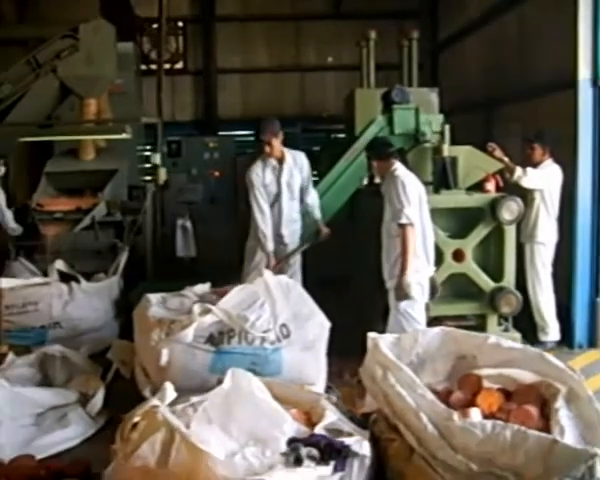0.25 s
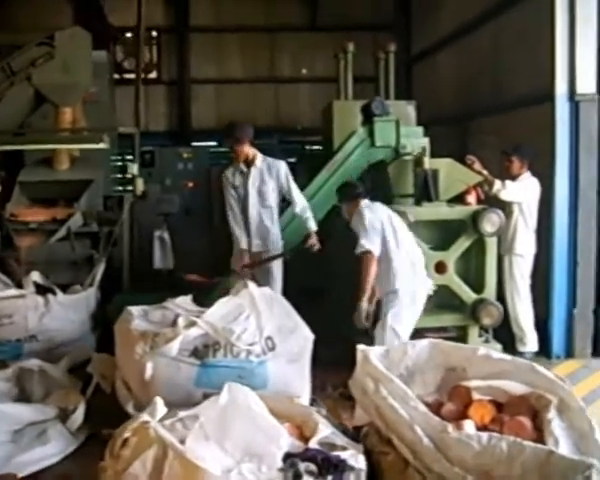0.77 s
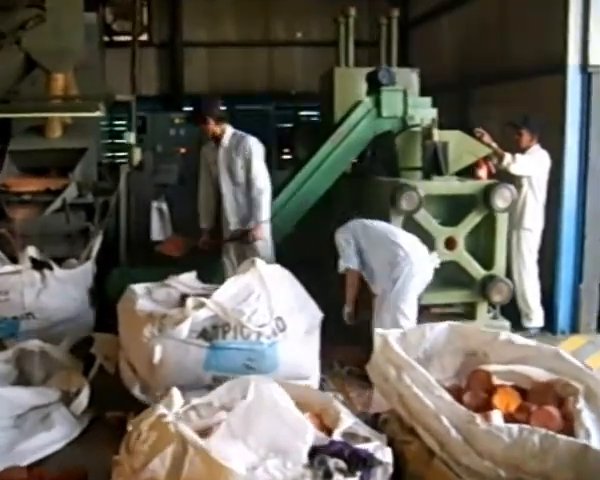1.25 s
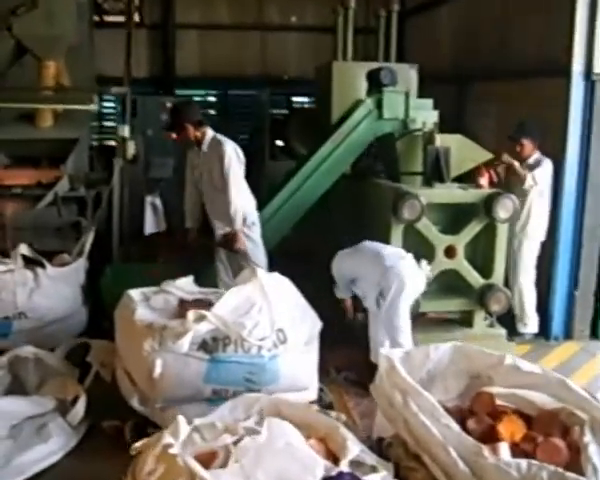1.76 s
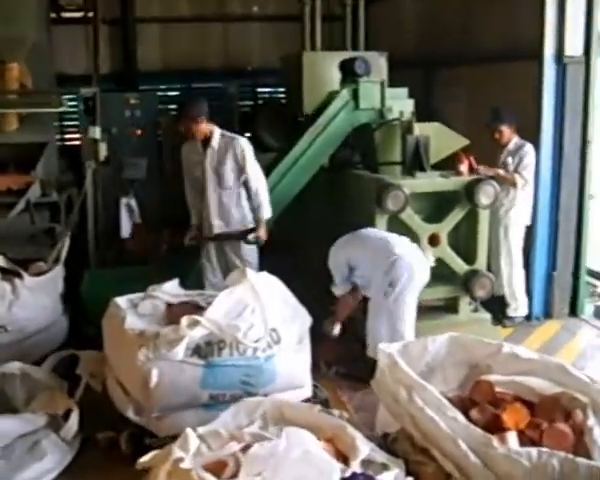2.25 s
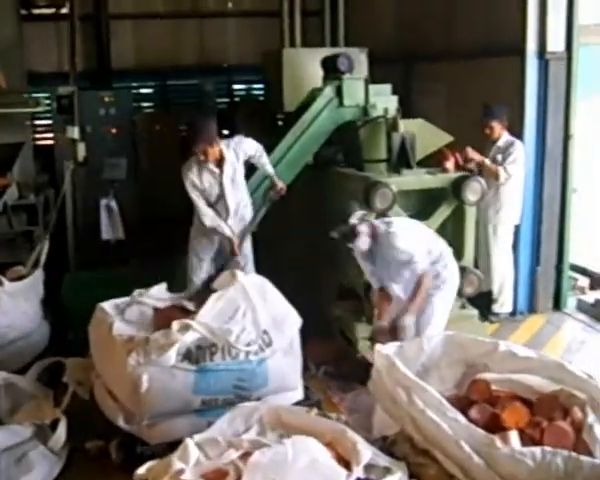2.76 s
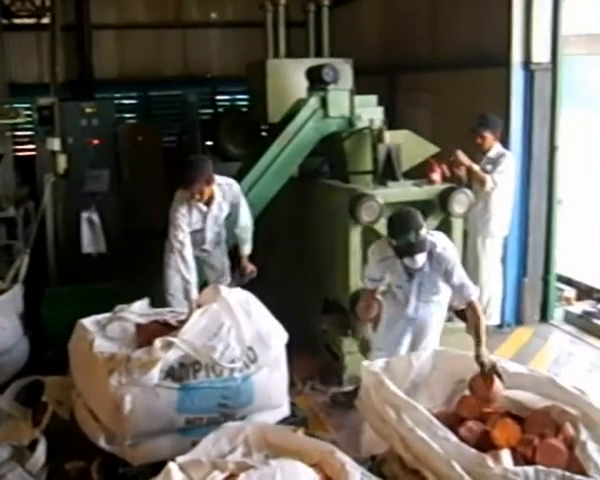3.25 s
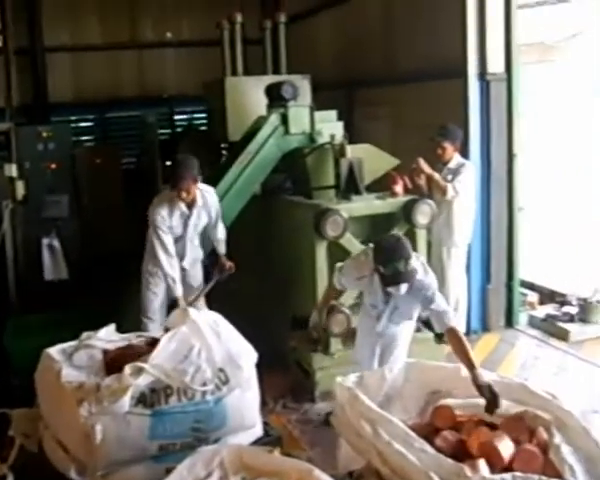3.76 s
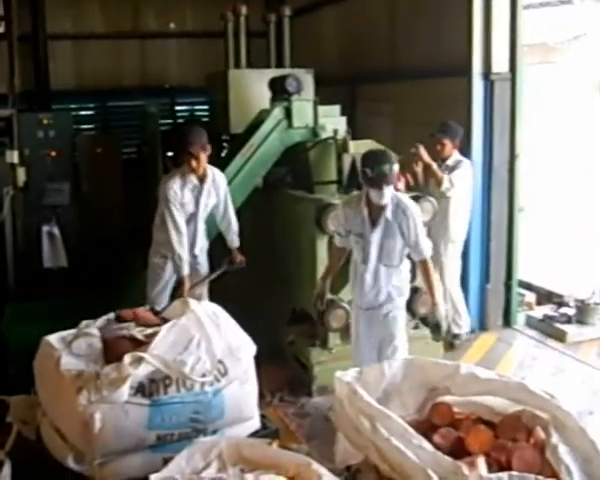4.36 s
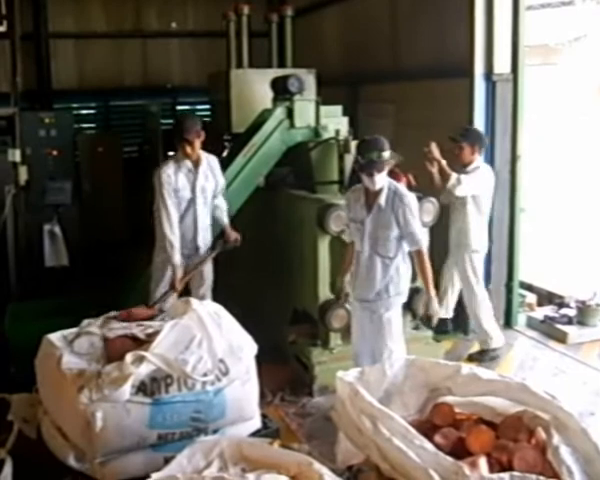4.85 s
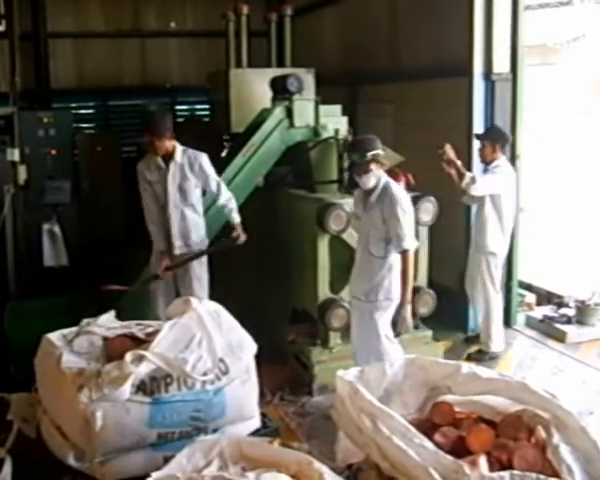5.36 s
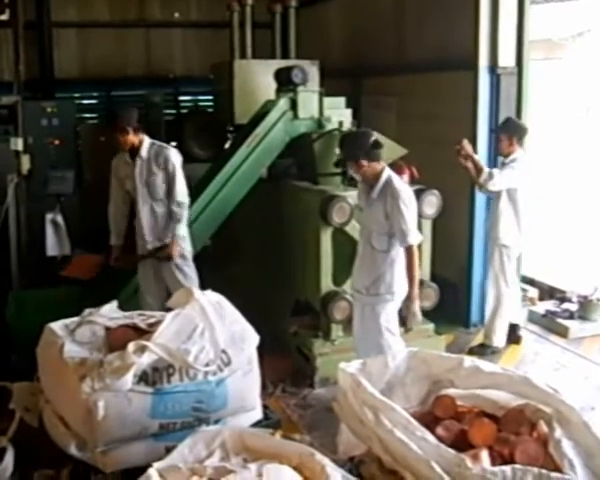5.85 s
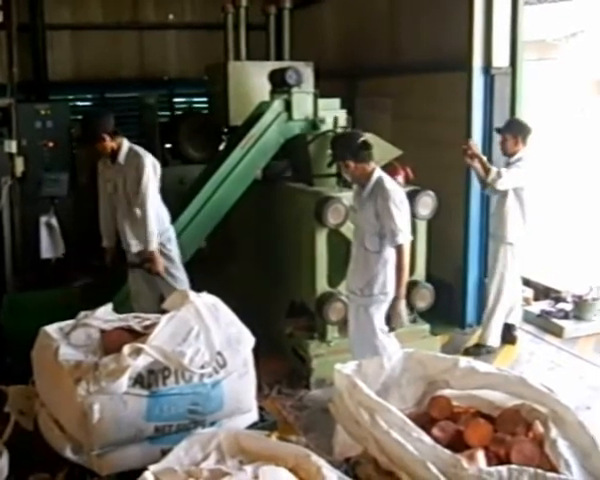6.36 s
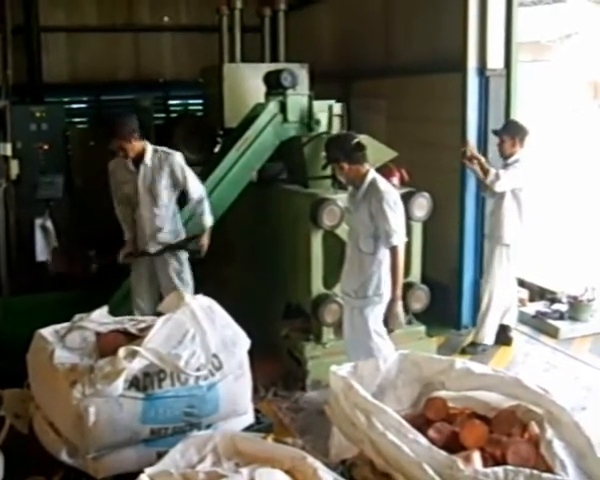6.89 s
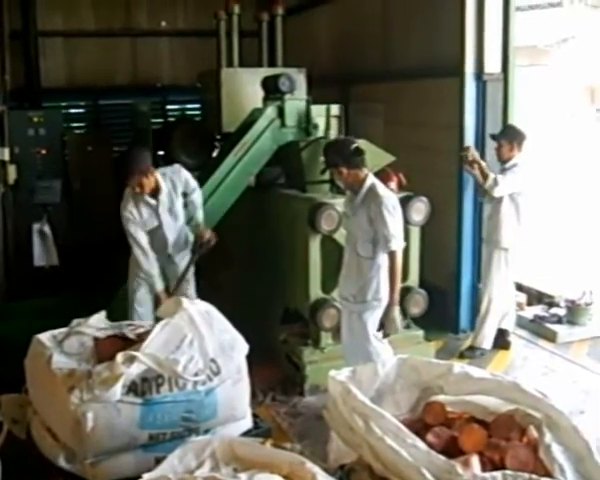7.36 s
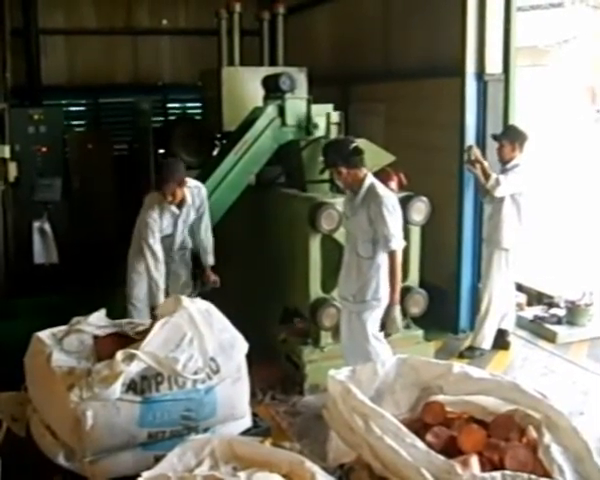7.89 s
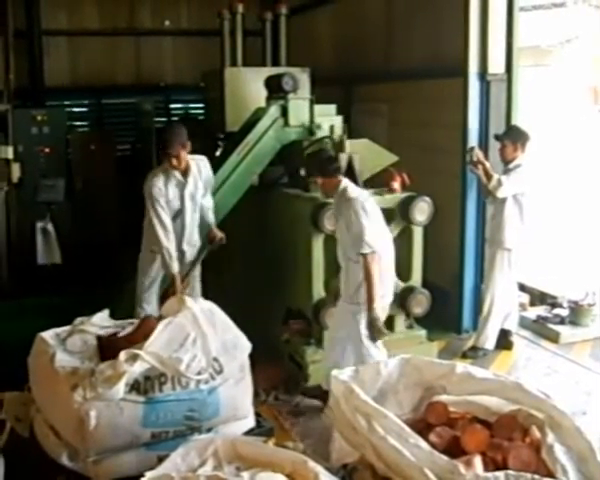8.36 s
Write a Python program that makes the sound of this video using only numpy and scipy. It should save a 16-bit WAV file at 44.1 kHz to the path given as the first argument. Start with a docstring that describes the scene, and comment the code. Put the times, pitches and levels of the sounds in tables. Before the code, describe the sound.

A hydraulic press runs in a factory hall, with a steady pump and motor hum over a roar of fans and hissing oil. Right at the start, four quick steel knocks clank and ring, with one sharp microphone click. The ram thuds at about 1.6 seconds, and metal briquettes clink faintly between 2.6 and 3.4 seconds. At about 4.1 seconds the sound cuts to complete silence for one second. It returns with the pump whining and sagging slightly in pitch, until a valve releases with a gush and a thud at 5.7 seconds. Another faint clink comes at 6.6 seconds. From 7.5 to 8 seconds, loud ringing knocks, heavy thuds and a stronger hissing gush crowd together, and the microphone crackles on the loudest blows. From about 8 seconds a soft low drone joins the continuing hum.

```python
"""Hydraulic briquetting press in a steel-walled hall. Pump and feed motor hum over a roar of oil and fans.
Plates knock and ring, the ram thuds, briquettes clink. At 4.07 s the mono camera cuts out for 1 s.
From 5 s pressure builds: the pump sags and whines until a valve lets go with a gush and a thud.
From 7.5 s: more knocks, thuds and a gush; the camera overloads and crackles on the loudest knocks.
At 8.05 s a low drone starts the next stroke."""
import sys
import numpy as np
from scipy import signal
from scipy.fft import rfft, irfft, next_fast_len
from scipy.io import wavfile
from scipy.ndimage import map_coordinates

SR = 44100
rng = np.random.default_rng(int(sys.argv[2]) if len(sys.argv) > 2 else 0)


def generate_wav(sig):
    """Save sig (samples, or channels by samples) to the path in sys.argv[1] as 16-bit PCM at SR."""
    pcm = np.round(np.clip(np.atleast_2d(sig).T, -1, 1) * 32767).astype(np.int16)
    wavfile.write(sys.argv[1], SR, pcm)


N = 380141

PUMP_HZ, MOTOR_HZ = 58.32, 24.52
PRESS_START_S, PRESS_END_S, LOAD_ATTACK_S = 5.0, 5.72, .2

# steel on steel: t/s, clank/dB, cover ring/dB, die ring/dB, clank T60/s
PLATE_KNOCKS = [(.134, -11.5, -8.5, -25, 0.49), (.166, -19, -9.5, -38, 0.33), (.213, -13.5, -22, -20, 0.82),
                (.335, -25, -18, -36, 0.72), (7.464, -14, -34, -17, 0.28), (7.859, -12.5, -30, -14, 0.93),
                (7.89, -15.5, -21, -15, 1)]
# ram stops: t/s, level/dB
RAM_STOPS = [(1.557, -16.5), (5.736, -15), (7.484, -14.5), (7.57, -18), (7.932, -15.5)]
# valve releases: t/s, level/dB, rise/s
VALVE_RELEASES = [(5.67, -22, 0.02), (7.543, -16.5, 0.0088)]
# briquettes and swarf: t/s, level/dB
BRIQUETTE_CLINKS = [(2.622, -36), (3.014, -30), (3.061, -36), (3.34, -29), (6.565, -35)]
# steady noise: t/s, roar/dB, oil hiss/dB
FLOW_LEVELS = [(0, -16.5, -32), (.6, -19, -30.5), (3, -19.5, -29), (5.1, -19, -30), (6.2, -19.5, -29),
               (8.6, -19, -30)]
# camera overload clicks: t/s, level/dB
OVERLOAD_CLICKS = [(0.217, -13), (7.8645, -9.5), (7.875, -11), (7.907, -12), (7.935, -12), (7.943, -9)]
# camera dropout: start/s, end/s
DROPOUT_S = (4.0708, 5.0705)

# sheet-steel cover modes: f/Hz, level/dB
COVER_MODES = [(455, -8.5), (555, -9.5), (582, 2), (872, -11), (1030, -18.5), (1390, -15.5), (2120, -15),
               (3220, -13), (3520, -16.5), (3980, -14), (4470, -16)]
# heavy die modes: f/Hz, level/dB
DIE_MODES = [(690, -12.5), (797, -5.5), (888, -6.5), (1020, -1.5), (1250, -3.5), (1540, -3), (1740, -10),
             (1900, -7), (2200, -8), (3250, -13.5), (4890, -18)]
# pump whine under load: harmonic, level/dB
WHINE_HARMONICS = [(1, -29), (2, -27.5), (10, -26.5), (11, -36), (13, -34.5), (14, -32), (16, -33),
                   (20, -40)]
# relief valve tones before sag: f/Hz, level/dB
RELIEF_TONES = [(850, -26.5), (1493, -30)]
# pump pistons: harmonic, feed stroke/dB, return stroke/dB
PUMP_HARMONICS = [(4, -36, -55), (8, -47, -42), (9, -35, -32.5), (10, -37, -39.5), (12, -39, -42.5),
                  (14, -37, -44), (15, -42.5, -37), (24, -41.5, -44), (27, -47.5, -41.5), (31, -44, -52),
                  (37, -43, -43.5), (41, -43, -51), (42, -52, -43), (45, -53.5, -43), (62, -45, -45)]
# feed motor shaft: harmonic, level/dB
MOTOR_HARMONICS = [(1, -47), (8, -32.5), (10, -41), (13, -37.5), (15, -27.5), (16, -40), (17, -32),
                   (18, -41), (19, -35), (20, -36)]

# steel clank: f/Hz, relative density/dB
CLANK_SPECTRUM = [(100, -20), (300, -7.5), (550, -0.5), (900, -1), (1600, -5), (2300, -12.5), (3500, -21),
                  (7000, -33), (12000, -54)]
# frame thud: f/Hz, relative density/dB
THUD_SPECTRUM = [(30, -9), (80, -9), (200, 0), (350, -2.5), (600, -13), (1500, -41.5)]
# hiss of a knock: f/Hz, relative density/dB
HISS_SPECTRUM = [(700, -23), (2000, -4), (3300, 4.5), (5000, -1), (7000, -9.5), (10000, -19),
                 (12500, -34.5)]
# released oil: f/Hz, relative density/dB
GUSH_SPECTRUM = [(700, -22), (2000, 4), (3300, 2.5), (5000, 1.5), (7000, -9), (10000, -10), (12500, -28)]
# roar of oil and fans: f/Hz, relative density/dB
ROAR_SPECTRUM = [(26, -58.5), (45, -23), (103, -7.5), (164, -9), (189, -6.5), (341, -1.5), (366, -3),
                 (393, -6.5), (521, -6), (559, -8.5), (795, -9.5), (2770, -20), (5880, -25), (9200, -31),
                 (12500, -50)]
# oil in the valves: f/Hz, relative density/dB
OIL_SPECTRUM = [(1500, -26.5), (2800, -7.5), (3800, 0), (5200, -3), (7000, -9.5), (9500, -13.5),
                (12500, -26)]
# briquette clink, overload click: f/Hz, relative density/dB
CLINK_SPECTRUM = [(800, -16), (2500, 10), (5000, 2), (9000, 9), (12000, -14)]
OVERLOAD_SPECTRUM = [(3000, -6), (6000, 3.5), (9000, 4), (12300, -7)]


def plate_knocks(rise_s=.0034, thud_db=-7.5, hiss_db=-8.5, ring_t60_ratio=1.39):
    """Each blow clanks, thuds in the frame, hisses and rings cover and die."""
    out, t = np.zeros(N), clock()[:SR]
    for start_s, clank_db, cover_db, die_db, t60_s in PLATE_KNOCKS:
        body = noise(CLANK_SPECTRUM, SR) + undb(thud_db) * noise(THUD_SPECTRUM, SR)
        body *= burst(rise_s, t60_s)
        hiss = undb(hiss_db) * noise(HISS_SPECTRUM, SR) * burst(rise_s, t60_s)
        steel = undb(cover_db) * steel_ring(COVER_MODES, t) + undb(die_db) * steel_ring(DIE_MODES, t)
        steel *= burst(rise_s, t60_s * ring_t60_ratio)
        add(out, start_s, undb(clank_db) * (body + hiss) + steel)
    return out


def steel_ring(modes, t, detune=.007, loss_per_cycle=.00098):
    """Close mode pairs beat; higher modes decay sooner."""
    pairs = np.zeros(len(t))
    for hz, db in modes * 2:
        turns = hz * t * (1 + detune * rng.standard_normal()) + rng.random()
        pairs += undb(db) * np.exp(-loss_per_cycle * hz * t) * np.sin(2 * np.pi * turns)
    return pairs / np.sqrt(sum(undb(db) ** 2 for _, db in modes))


def ram_thuds(rise_s=.0058, t60_s=.93, clank_db=-6, ring_db=-11.5):
    """The stopping ram shakes the frame, with some clank and die ring."""
    out, t = np.zeros(N), clock()[:SR]
    for start_s, db in RAM_STOPS:
        body = noise(THUD_SPECTRUM, SR) + undb(clank_db) * noise(CLANK_SPECTRUM, SR)
        body += undb(ring_db) * steel_ring(DIE_MODES, t)
        add(out, start_s, undb(db) * body * burst(rise_s, t60_s))
    return out


def oil_gushes(hold_s=.038, t60_s=1, pipe_db=.5):
    """Released oil hisses and rattles the pipes."""
    out = np.zeros(N)
    for start_s, db, rise_s in VALVE_RELEASES:
        gush = noise(GUSH_SPECTRUM, SR) + undb(pipe_db) * noise(CLANK_SPECTRUM, SR)
        add(out, start_s, undb(db) * gush * burst(rise_s, t60_s, hold_s))
    return out


def pump_strain(whine_hz=114.85, sag=.014, relief_db_per_harmonic=-.22, rasp_db=-30, release_s=.06):
    """Pressure slows the whining pump; the relief valve whistles and dulls it. All fade on release."""
    t = clock()
    pressure = ramp(t, PRESS_START_S, PRESS_END_S)
    opening = ramp(pressure, .42, .61)
    slowed_s = np.cumsum(1 - sag * pressure ** 2) / SR
    dulling_db = relief_db_per_harmonic * opening
    whine = sum(undb(db + k * dulling_db) * tone(k * whine_hz * slowed_s, waver_db=1, waver_turns=.06)
                for k, db in WHINE_HARMONICS)
    whistle = sum(undb(db) * tone(hz * slowed_s, waver_db=1, waver_turns=.06) for hz, db in RELIEF_TONES)
    rasp = undb(rasp_db) * noise(CLANK_SPECTRUM, N)  # oil forced through pipes
    attack = ramp(t, PRESS_START_S, PRESS_START_S + LOAD_ATTACK_S)
    release = np.exp(-np.maximum(t - PRESS_END_S, 0) / release_s)
    return ((whine + rasp) * attack + whistle * opening) * release


def pump_hum(waver_db=.5, drift=.000588, reverse_s=.2):
    """Piston harmonics; their balance shifts as the valve reverses the ram."""
    turns = np.cumsum(PUMP_HZ * (1 + drift * walk(2))) / SR
    returning = ramp(clock(), PRESS_END_S - reverse_s / 2, PRESS_END_S + reverse_s / 2)
    hum = np.zeros(N)
    for k, feed_db, return_db in PUMP_HARMONICS:
        gain = (1 - returning) * undb(feed_db) + returning * undb(return_db)
        hum += gain * tone(k * turns, waver_db)
    return hum


def feed_motor(frame_hz=34, frame_db=-47, waver_db=.76, drift=.00095):
    """Shaft harmonics; a slow frame vibration beats against them."""
    turns = np.cumsum(MOTOR_HZ * (1 + drift * walk(2))) / SR
    hum = sum(undb(db) * tone(k * turns, waver_db) for k, db in MOTOR_HARMONICS)
    return hum + undb(frame_db) * tone(frame_hz * clock(), waver_db)


def pump_drone(start_s=8.05, hz=119, level_db=-35):
    """The pump takes up load again with a low drone."""
    t = clock()
    return undb(level_db) * tone(hz * t, waver_db=1) * ramp(t, start_s, start_s + LOAD_ATTACK_S)


def briquette_clinks(decay_s=.03):
    """Pressed metal touches metal: a short, dry chink."""
    out, t = np.zeros(N), clock()[:SR // 4]
    for start_s, db in BRIQUETTE_CLINKS:
        add(out, start_s, undb(db) * np.exp(-t / decay_s) * noise(CLINK_SPECTRUM, len(t)))
    return out


def overload_clicks(decay_s=.00083):
    """Sharp crackles of the camera overloading on the loudest knocks."""
    out, t = np.zeros(N), clock()[:SR // 100]
    for start_s, db in OVERLOAD_CLICKS:
        add(out, start_s, undb(db) * np.exp(-t / decay_s) * noise(OVERLOAD_SPECTRUM, len(t)))
    return out


def oil_and_fans(throb_depth=.052, throb_below_hz=700, roar_flicker_db=.17, hiss_flicker_db=.6):
    """Roar whose lows throb with the motor shaft; oil hisses in the valves."""
    times_s, *levels_db = np.transpose(FLOW_LEVELS)
    roar_db, hiss_db = (np.interp(clock(), times_s, db) for db in levels_db)
    roar = noise(ROAR_SPECTRUM, N)
    lows = signal.sosfiltfilt(signal.butter(2, throb_below_hz, fs=SR, output="sos"), roar)
    shaft_rad = 2 * np.pi * MOTOR_HZ * clock()
    roar += lows * throb_depth * (np.sin(shaft_rad) + np.sin(2 * shaft_rad))
    hiss = noise(OIL_SPECTRUM, N)
    roar *= undb(roar_db + roar_flicker_db * walk(19))
    hiss *= undb(hiss_db + hiss_flicker_db * walk(12))
    return roar + hiss


def tone(turns, waver_db, waver_turns=.028):
    """Sine, rms 1; hall multipath wavers level and phase as the camera moves."""
    gain = undb(waver_db * walk(3))
    return unit(gain * np.sin(2 * np.pi * (turns + rng.random() + waver_turns * walk(6))))


def burst(rise_s, t60_s, hold_s=0, rattle_db=.45):
    """1 s envelope: rise, hold, then a tail the hall smears into a rattle."""
    t = clock()[:SR]
    decay = undb(-60 * np.maximum(t - hold_s, 0) / t60_s)
    return ramp(t, 0, rise_s) * decay * undb(rattle_db * walk(70)[:SR])


def noise(spectrum, size):
    """Shaped noise, rms 1."""
    hz, db = np.transpose(spectrum)
    n = next_fast_len(size)
    bins_hz = np.maximum(np.arange(n // 2 + 1) * SR / n, 1)
    gain = undb(np.interp(np.log(bins_hz), np.log(hz), db, left=-90, right=-90))
    return unit(irfft(rfft(rng.standard_normal(n)) * gain, n)[:size])


def walk(rate_hz):
    """Smooth random curve, spread near 1."""
    coarse = np.arange(0, N, 64)
    values = map_coordinates(rng.standard_normal(2048), [coarse / SR * rate_hz], order=3, mode="wrap")
    return np.interp(np.arange(N), coarse, values)


def add(out, start_s, sound):
    """Mix in at start_s."""
    i = int(start_s * SR)
    out[i:i + len(sound)] += sound[:N - i]


def ramp(x, start, end):
    """Linear 0 to 1, clamped."""
    return np.clip((x - start) / (end - start), 0, 1)


def undb(db):
    """dB to gain."""
    return 10 ** (np.asarray(db) / 20)


def unit(x):
    """Scale to rms 1."""
    return x / np.sqrt(np.mean(x ** 2))


def clock():
    """Sample times/s."""
    return np.arange(N) / SR


def scene():
    """The press at one microphone, plus overload clicks."""
    running = pump_hum() + feed_motor() + pump_strain() + pump_drone() + oil_and_fans()
    mono = running + plate_knocks() + ram_thuds() + oil_gushes() + briquette_clinks() + overload_clicks()
    return np.array([mono, mono])


def record(dry, ceiling=.88, lowpass_hz=12300):
    """Camera: peak overload, 1 s dropout, low-pass."""
    live = (clock() < DROPOUT_S[0]) | (clock() > DROPOUT_S[1])
    clipped = np.clip(dry, -ceiling, ceiling) * live
    return signal.sosfilt(signal.ellip(10, .2, 90, lowpass_hz, fs=SR, output="sos"), clipped)


dry = scene()
out = record(dry)
generate_wav(out)
```